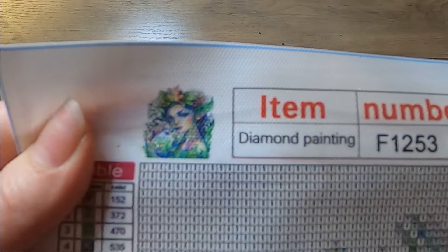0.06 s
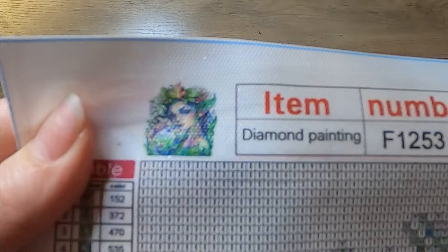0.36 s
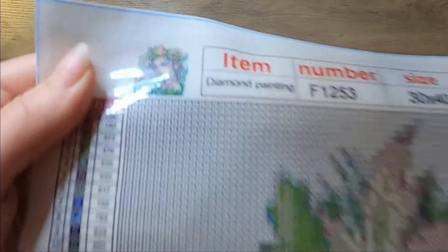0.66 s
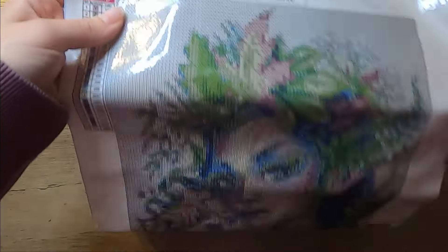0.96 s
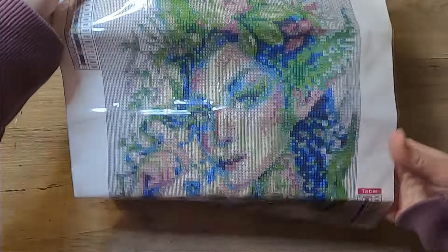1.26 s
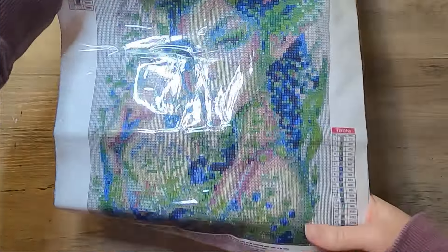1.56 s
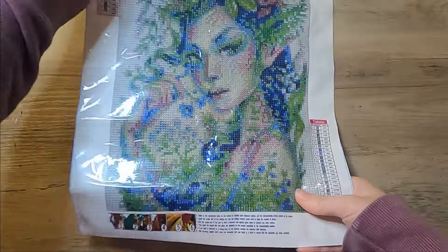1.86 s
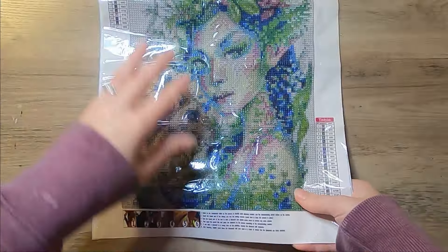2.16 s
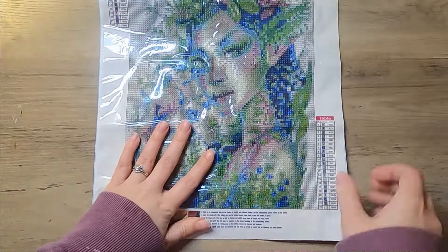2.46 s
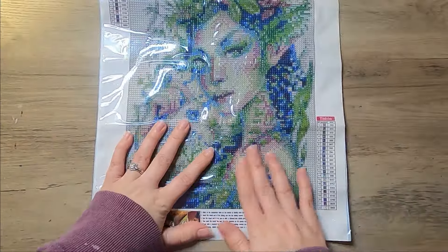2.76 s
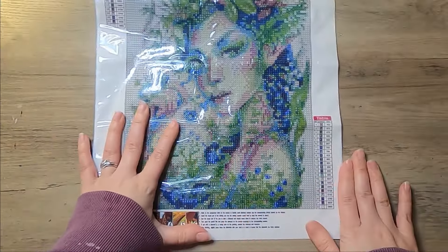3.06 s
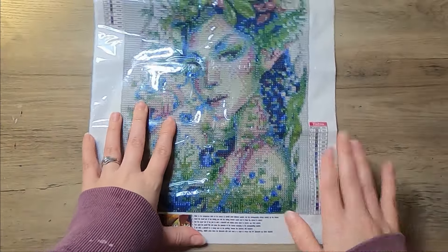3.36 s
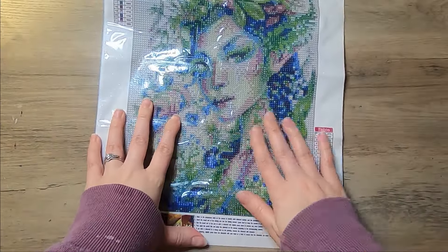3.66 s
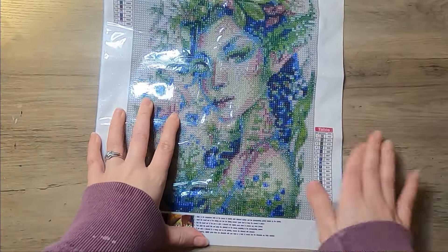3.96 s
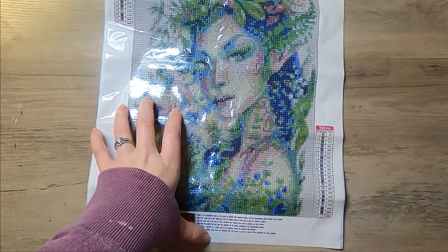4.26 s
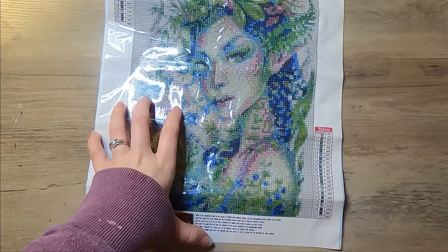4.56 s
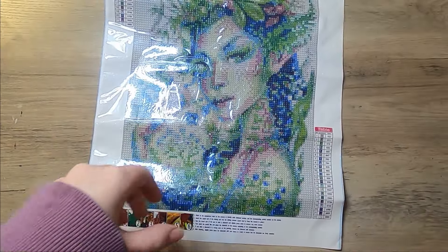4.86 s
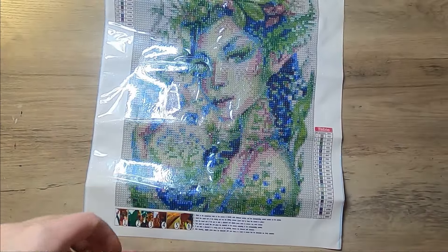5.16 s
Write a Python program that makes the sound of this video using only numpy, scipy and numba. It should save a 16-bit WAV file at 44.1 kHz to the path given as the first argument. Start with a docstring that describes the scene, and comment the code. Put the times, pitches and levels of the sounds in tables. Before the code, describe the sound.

A few faint ticks give way to a burst of sharp crinkling and dull thumps as hands turn a canvas under stiff plastic film. The sheet wobbles softly, pops once loudly and settles on a wooden table. Hands then smooth it in several swishing, crackling strokes that thin out to small presses, a soft brush of cloth and one last crisp snap. The sound is close, in a quiet room.

```python
"""In a small quiet room, close to a phone, a canvas under stiff plastic film is lifted and turned.
Handling it makes soft low thumps, creases snap and crinkle, and the loose sheet drums and pops faintly.
It is dragged down onto a wooden table, buckles with a loud pop and flops on the wood.
Palms then press and rub it flat, while the film goes on crackling.
Last come a few short presses, the soft brush of a sleeve and a snap as the hand lifts off."""
import sys
import numpy as np
from scipy import signal
from scipy.fft import rfft, irfft
from scipy.io import wavfile
from scipy.ndimage import uniform_filter1d
from numba import njit

SR = 44100
rng = np.random.default_rng(int(sys.argv[2]) if len(sys.argv) > 2 else 0)


def store_pcm(level_fs):
    """Save levels as 16-bit WAV."""
    pcm = np.round(np.clip(level_fs, -1, 1) * 32767).astype(np.int16)
    wavfile.write(sys.argv[1], SR, np.atleast_2d(pcm).T)


N = 230145
MIC_LAG_SAMPLES = 3  # the left microphone is a little further from the sheet


def undb(db):
    """Turn decibels into a gain."""
    return 10 ** (np.asarray(db) / 20)


def curves(table):
    """Join a table's rows with straight lines in time, one curve per column."""
    times, *columns = np.transpose(table)
    return [np.interp(np.arange(N) / SR, times, column) for column in columns]


def colour(x, points):
    """Shape the tone along (Hz, dB) points, with a filter that never rings ahead of the sound."""
    size = 4096
    hz, db = np.transpose(points)
    grid = np.maximum(np.fft.rfftfreq(size, 1 / SR), 1)
    gains = undb(np.interp(np.log(grid), np.log(hz), db))
    cepstrum = irfft(np.log(gains))
    cepstrum[1:size // 2] *= 2
    cepstrum[size // 2 + 1:] = 0
    response = irfft(np.exp(rfft(cepstrum)))
    return signal.fftconvolve(np.atleast_2d(x), response[None], axes=1)[:, :x.shape[-1]]


@njit
def resonate(x, hz, width):
    """Let through one band of pitches, whose centre and width may move."""
    y, band, low = np.empty(len(x)), 0., 0.
    for i in range(len(x)):
        g, damping = np.tan(np.pi * min(hz[i] / SR, .45)), width[i] / hz[i]
        v = (band + g * (x[i] - low)) / (1 + g * (g + damping))
        band, low, y[i] = 2 * v - band, low + 2 * g * v, damping * v
    return y


def ring(pair, hz, q):
    """Make both channels ring at one pitch; a higher q rings longer."""
    hz = hz * np.ones(pair.shape[1])
    return np.array([resonate(x, hz, hz / q) for x in pair])


def even(x, span_s):
    """Hold the average level at 1 while single clicks still stand out."""
    power = uniform_filter1d(np.mean(x ** 2, axis=0), max(int(span_s * SR / 2), 8))
    power = uniform_filter1d(power, max(int(span_s * SR), 8))
    return x / np.sqrt(np.maximum(power, 1e-6 * power.mean()))


def pan(db):
    """Left and right gains, with the left louder by db."""
    return undb(np.array([[.5], [-.5]]) * db)


def add(out, s, sound):
    """Mix a short sound in at s seconds."""
    i = int(np.clip(s * SR, 0, N - 1))
    out[:, i:i + sound.shape[1]] += sound[:, :N - i]


def noise(size, apart):
    """Stereo noise; the larger apart is, the more left and right differ."""
    return (rng.standard_normal(size) + apart * rng.standard_normal((2, size))) / np.hypot(1, apart)


def clicks(rate, spread_db):
    """About rate random clicks a second, many small and a few large."""
    fired = np.flatnonzero(rng.random(N) < rate / SR)
    sizes = undb(spread_db * np.minimum(rng.exponential(size=len(fired)), 4))
    out = np.zeros(N)
    out[fired] = sizes * rng.choice([-1, 1], len(fired))
    return out


def flutter(rate):
    """A random wobble of size near 1 that turns rate times a second."""
    hold = max(int(SR / rate), 2)
    steps = np.repeat(rng.standard_normal(N // 50), hold)[:N]
    return 1.2 * uniform_filter1d(steps, hold)


def place(pair):
    """Each crease lies at its own spot, so the delay between left and right varies a little."""
    right = np.pad(pair[1], (rng.integers(0, MIC_LAG_SAMPLES), 0))
    return np.array([pair[0], right[:pair.shape[1]]])


def microphones(pair):
    """The right microphone hears more bass and high treble, the left more of the low treble."""
    # how their tone differs: (frequency [Hz], left minus right [dB])
    difference = [(100, -5), (700, -2.5), (1300, -1.5), (2400, 1), (4400, 4.5), (6000, 0.5), (8100, -6.5),
                  (15000, -4)]
    return np.vstack([colour(x, [(hz, side * db) for hz, db in difference])
                      for x, side in zip(pair, (.5, -.5))])


def crease(crack_s, ring_s, ring_db, apart):
    """One crease: a sharp crack, then ripples that die away across the film."""
    t = np.arange(SR // 50) / SR
    crack = np.exp(-t / crack_s) * noise(len(t), apart)
    ripples = undb(ring_db) * np.exp(-t / ring_s) * noise(len(t), 2 * apart)
    return (crack + ripples) / np.sqrt(np.sum((crack + ripples) ** 2) / 2)


def grains(rate, spread_db, apart, spots=12):
    """Clicks from several spots that each ring in their own way."""
    out = 0
    for _ in range(spots):
        hits = clicks(rate / spots, spread_db)
        spot = crease(crack_s=0.00012, ring_s=0.0017, ring_db=-19, apart=apart)
        out = out + signal.oaconvolve(hits[None], spot, axes=1)[:, :N]
    return out


def swell(s, attack_s, hold_s, release_s):
    """Power of a hand movement: it rises 20 dB over the attack, holds, and falls 20 dB per release."""
    t = np.arange(N) / SR - s
    away = np.maximum(-t / attack_s, (t - hold_s) / release_s)
    return undb(-20 * np.clip(away, 0, 10)) ** 2


def room_tone():
    """The quiet room: a low rumble with a little hiss."""
    # tone of the room: (frequency [Hz], level [dB])
    rumble_colour = [(20, -8), (40, 3), (65, -20), (100, -28), (170, -18.5), (280, -24.5), (600, -35),
                     (1500, -39.5), (3000, -58), (4300, -50), (7500, -58), (9500, -55), (15000, -63)]
    rumble = colour(noise(N, apart=1.0), rumble_colour)
    return rumble / rumble.std() * undb(-58)


def room_echo(x, decay_s, level_db):
    """The table and near walls send back a short echo with the highest treble softened."""
    t = np.arange(SR // 2) / SR
    tail = rng.standard_normal((2, len(t))) * undb(-60 * t / decay_s) * (t > .003)
    tail /= np.sqrt(np.sum(tail ** 2) / 2)
    tail = colour(tail, [(200, 0.5), (1500, 2.0), (7000, 3.0), (14000, -10)])
    return undb(level_db) * signal.fftconvolve(x, tail, axes=1)[:, :N]


def sleeve():
    """A sleeve brushes along with a soft hiss."""
    # tone of the cloth: (frequency [Hz], level [dB])
    cloth_colour = [(500, 0), (2500, -13.5), (4300, 1.5), (7400, -1), (8600, -9.5), (14000, -39)]
    # strength of the brushing: (time [s], level [dB])
    brushing = [(0, -90), (3.9, -61.5), (4.2, -66), (4.6, -75.5), (4.85, -72.5), (5.0, -72), (5.14, -77.5),
                (5.22, -78)]
    hiss = colour(noise(N, apart=0.84), cloth_colour)
    db, = curves(brushing)
    return hiss / hiss.std() * undb(db)


def drumming(rub_db):
    """The loose sheet booms like a drum skin whose tightness changes; lying flat, it barely sounds."""
    # the sheet tightens and slackens: (time [s], level [dB], pitch [ratio])
    tightening = [(0.65, -76, 0.79), (0.85, -54.5, .72), (1.25, -57, 0.97), (1.375, -46.5, 1.19),
                  (1.555, -47.5, 0.93), (1.61, -53, 0.94), (1.84, -54.5, 1.3), (2.02, -59.5, 1.22),
                  (2.15, -90, 1.1)]
    # notes of the loose sheet: (frequency [Hz], level [dB])
    notes = [(415, -7.5), (540, 1), (690, -1.5)]
    # tone of the boom: (frequency [Hz], level [dB])
    boom_colour = [(90, -29.5), (250, -8), (400, 0), (560, -2.5), (680, -5.5), (850, -6.5), (1500, 2),
                   (4000, -45.5)]
    db, pitch = curves(tightening)
    t = np.arange(N) / SR
    loose = (t > tightening[0][0]) & (t < tightening[-1][0])
    pitch = pitch * np.exp(.04 * flutter(15))
    push = grains(rate=1500, spread_db=4, apart=0.071)
    boom = sum(undb(note_db) * ring(push, hz * pitch, q=8.2) for hz, note_db in notes)
    skin = even(colour(boom + 0.18 * push, boom_colour), span_s=0.16)
    return skin * (loose * undb(db) + undb(rub_db - 29.5))


def thumps():
    """Soft low thumps as the canvas is handled, buckles and lands: a low pulse plus a dull pat."""
    # the thumps: (time [s], level [dB], pitch [Hz], pat relative to that level [dB])
    low_thumps = [(0.008, -45.5, 42.7, -12), (0.393, -46.5, 46.3, -11), (0.62, -51.5, 48.4, -7),
                  (0.7, -52, 120, -8.5), (0.797, -38, 333, -2), (0.855, -30.5, 70.4, -9),
                  (0.9, -34.5, 50, -18), (0.946, -30, 416, -9.5), (0.983, -37.5, 144, -15),
                  (1.051, -34.5, 68, -13.5), (1.075, -40, 45.7, -7.5), (1.362, -38.5, 48, -9),
                  (1.663, -42, 149.2, -7), (1.731, -34.5, 50, -11), (1.889, -41.5, 50, -13),
                  (2.03, -48, 149, -6), (2.08, -46.5, 55, -10), (2.355, -38.5, 54.9, -10.5),
                  (2.489, -46.5, 259, -2.5), (2.751, -35.5, 46.3, -8.5), (2.86, -49, 170, -5.5),
                  (2.971, -37.5, 48.9, -5.5), (3.039, -41.5, 144.7, -7), (3.459, -44, 261.9, -1.5),
                  (3.499, -47, 46, -5), (3.853, -48, 46.4, -14), (4.06, -45, 219.4, -5),
                  (4.272, -43.5, 171, -5.5), (4.41, -48.5, 160, -4)]
    # dull tone of the pat: (frequency [Hz], level [dB])
    pat_colour = [(40, -18.5), (90, -9.5), (150, 1.5), (330, -3), (600, -17.5), (1500, -32), (5000, -60)]
    out, t = np.zeros((2, N)), np.arange(SR // 4) / SR
    rise = 1 - np.exp(-t / 0.0016)
    for s, db, hz, pat_db in low_thumps:
        pulse = rise * np.exp(-t * hz / .7) * np.sin(2 * np.pi * hz * t)
        pat = colour(rise * np.exp(-t / 0.048) * noise(len(t), apart=0.25), pat_colour)
        thump = 0.82 * pulse / np.abs(pulse).max() + undb(pat_db) * pat / np.abs(pat).max()
        add(out, s, undb(db) * thump)
    return out


def buckles():
    """The stiff canvas pops through and rings briefly."""
    # notes of the canvas: (frequency [Hz], level [dB], time to fade by 60 dB [s])
    notes = [(419, -9, 0.021), (639, -3.5, 0.018), (1316, -9, 0.012), (1450, -37, 0.014),
             (2840, -6.5, 0.011), (3750, -13.5, .007), (4200, 6.5, 0.0013), (5020, -9, .01),
             (6400, -16, .006), (7060, -14, 0.011)]
    # when it buckles: (time [s], peak level [dB])
    pops = [(0.945, -26.5), (1.8405, -13)]
    out, t = np.zeros((2, N)), np.arange(SR // 20) / SR
    pop = sum((-1) ** k * undb(db - 60 * t / decay_s) * np.sin(2 * np.pi * hz * t)
              for k, (hz, db, decay_s) in enumerate(notes))
    for s, db in pops:
        add(out, s, pop[None] / np.abs(pop).max() * undb(db))
    return out


def sliding():
    """How loud the rubbing is and how it rings over time; the strongest stroke leads."""
    # strokes of canvas and palms; the touched patch rings higher as it shrinks:
    # (time at full speed [s], attack [s], hold [s], release [s], level [dB],
    #  patch pitch [Hz], its rise [octaves], patch ring [dB], air gap ring [dB])
    strokes = [(0.808, 0.13, .15, .12, -45, 1380, 0.1, -6, -8),
               (1.057, 0.075, 0.064, .25, -42.5, 1460, 0.039, -4, -14),
               (1.349, .25, 0.045, 0.16, -42, 2560, 0, -14, -18),
               (1.501, 0.077, 0.065, .1, -40.5, 2454, 0.014, -4, -12),
               (1.732, 0.23, 0.16, .15, -48, 2836, -0.046, -12, -3),
               (1.958, 0.0058, 0.016, .05, -44, 1885, 0.051, -12, 10),
               (2.007, 0.032, .015, 0.025, -38, 1804, -0.07, 2.5, 10),
               (2.045, 0.017, 0.013, 0.096, -44, 1730, 0, 0, 15),
               (2.247, .12, 0.084, 0.11, -57, 1930, -0.34, -5, 8.5),
               (2.356, 0.00503, 0.038, 0.095, -42, 1467, 0.13, -2, 7),
               (2.439, .06, 0.06, 0.029, -38, 1639, 0.37, 8, -16),
               (2.55, 0.018, .13, .06, -62, 1700, 0.051, -1, -8),
               (2.749, .012, .006, 0.074, -48, 2430, -0.065, 10, -17),
               (2.871, 0.082, 0.16, .1, -51.5, 3004, 0.011, -3, -11),
               (3.189, 0.12, 0.048, 0.042, -36, 2430, 0.13, -1.5, -6),
               (3.407, .11, 0.036, 0.12, -39, 2514, -0.14, -3, -1.5),
               (3.513, 0.088, 0.019, .02, -44.5, 1708, 0.044, -10, 19),
               (3.633, 0.0092, 0.034, 0.057, -53, 2700, 0.013, 1, -2),
               (3.741, 0.029, 0.14, 0.11, -57, 2501, 0.055, -6, -16),
               (3.976, 0.063, 0.051, 0.092, -49.5, 2260, -0.03, -14, -26),
               (4.101, .05, .13, 0.076, -66.5, 1510, 0.012, -12, -8),
               (4.279, 0.026, .1, 0.068, -58.5, 1380, -0.19, -13, 14),
               (4.336, 0.039, 0.011, 0.033, -45.5, 1140, -0.077, 20, 16),
               (4.541, 0.062, 0.045, 0.17, -59, 1505, -0.011, -17, -0.5),
               (4.74, 0.021, 0.045, 0.29, -71.5, 1400, 0.035, -15, -3)]
    resting_power = undb(-81) ** 2  # fingers shift on the canvas
    t = np.arange(N) / SR
    total = pitch = patch = gap = 0
    for s, attack_s, hold_s, release_s, db, hz, octaves, patch_db, gap_db in strokes:
        power = swell(s, attack_s, hold_s, release_s) * undb(db) ** 2
        total += power
        pitch += power * np.interp(t, [s, s + hold_s], [hz, hz * 2 ** octaves])
        patch += power * patch_db
        gap += power * gap_db
    return 10 * np.log10(total + resting_power), pitch / total, patch / total, gap / total


def rubbing(db, patch_hz, patch_db, gap_db):
    """The weave catches and slips, ringing the touched patch and the air gap under the canvas."""
    # tone of the sliding weave: (frequency [Hz], level [dB])
    weave_colour = [(200, -20), (680, -25.5), (850, -13), (1080, -6), (1500, 0), (2600, 0), (4200, -5.5),
                    (7000, -23), (14000, -30.5)]
    stutter = grains(rate=4000, spread_db=1.4, apart=0.22) * undb(1.9 * flutter(110))
    slips = colour(stutter, weave_colour)
    patch = undb(patch_db) * ring(slips, patch_hz, q=7)
    air_gap = undb(gap_db) * ring(slips, hz=1053, q=6)
    return even(slips + 2 * (patch + air_gap), span_s=0.062) * undb(db + 1.2 * flutter(44.98))


def bending():
    """How loud, how bright and how far to one side the film crinkles as it bends, all in dB."""
    # the film is lifted, dragged down, pressed flat and let go: (time at full strength [s], attack [s],
    # hold [s], release [s], level [dB], bright edge relative to that level [dB], left minus right [dB])
    bends = [(0.80, 0.081, 0.093, 0.13, -41.5, -13.5, -1), (0.948, 0.12, .23, 0.095, -42, -13, -0.5),
             (1.28, 0.2, 0.23, 0.11, -42.5, -16.5, 0), (1.52, 0.06, 0.048, 0.13, -38, -9, -2),
             (1.669, 0.14, 0.24, 0.065, -43, -10, -2.5), (2.003, 0.1, 0.043, 0.056, -44.5, -11, -2),
             (2.12, 0.081, 0.14, 0.11, -59, -16, -1), (2.377, 0.064, 0.14, 0.12, -45, -9, -1),
             (2.612, 0.011, 0.094, 0.039, -56.5, -11, 0), (2.75, 0.022, 0.038, 0.019, -45, -10.5, 1.5),
             (2.829, 0.032, .07, 0.11, -38.5, -11.5, 1), (2.932, 0.048, 0.064, .09, -37, -17.5, 0),
             (3.066, 0.097, 0.064, .05, -44.5, -14, -2.5), (3.177, 0.076, 0.054, 0.044, -37.5, -14.5, -1.5),
             (3.412, .13, .04, 0.095, -39.5, -16.5, -1), (3.638, 0.018, .03, 0.044, -49.5, -5.5, -1.5),
             (3.738, 0.059, 0.021, 0.066, -44.5, -8, -0.5), (3.824, .03, 0.051, 0.057, -41.5, -11, -1),
             (3.969, .04, .03, 0.094, -40.5, -9, -1), (4.15, 0.096, .2, 0.24, -63, -16, 0),
             (4.527, .04, 0.07, 0.13, -63.5, -12, -0.5), (4.752, 0.011, 0.012, 0.11, -66, -3.5, 3)]
    body, edge, side = undb(-85.5) ** 2, undb(-99) ** 2, 0  # the film held still
    for s, attack_s, hold_s, release_s, db, edge_db, side_db in bends:
        power = swell(s, attack_s, hold_s, release_s) * undb(db) ** 2
        body += power
        edge += power * undb(edge_db) ** 2
        side += power * side_db
    return 10 * np.log10(body), 10 * np.log10(edge), side / body


def crinkle(db, edge_db, rub_db, spots=24):
    """Tiny spots of film tick in flurries, each at its own pitch; sliding crowds the ticks into a blur."""
    # main tone of the ticks: (frequency [Hz], level [dB])
    body_colour = [(300, -9.5), (800, -37.5), (1500, -6.5), (3000, 0), (4500, 3.5), (5600, 0.5),
                   (7600, -2.5), (8800, -20), (12000, -30.5)]
    # their bright edge: (frequency [Hz], level [dB])
    edge_colour = [(3000, -42), (6500, -24), (8200, -4), (9800, 0), (12300, 7), (14000, -5), (16000, -14.5)]
    ticks_per_s = (1050 * undb(.8 * (rub_db + 50.5)) + 260) * undb(4 * flutter(70))
    ticks = 0
    for hz in np.geomspace(2500, 10000, spots):
        crack = crease(crack_s=.0002, ring_s=.0016, ring_db=-14, apart=.8)
        tick = place(ring(crack, hz, q=2.2))
        hits = clicks(ticks_per_s / spots, spread_db=2.3)
        ticks = ticks + signal.oaconvolve(hits[None], tick, axes=1)[:, :N]
    body = even(colour(ticks, body_colour), span_s=0.047) * undb(db)
    edge = even(colour(ticks, edge_colour), span_s=0.038) * undb(edge_db)
    return body + edge


def snaps():
    """A big crease snaps through and rings a small spot of film; a sharp fold adds a bright edge."""
    # creases that snap through: (time [s], level over 1 ms [dB], pitch [Hz],
    # bright edge relative to the body [dB], left minus right [dB])
    creases = [(0.1837, -44.0, 6200, -15, 3), (0.4702, -48.0, 6800, -5, 4), (0.5349, -43.5, 3900, 4, -7),
               (0.5933, -48.0, 6700, -1, -7), (0.6791, -41.0, 6000, -4, -8), (0.7003, -29.5, 6600, -9, -7),
               (0.7759, -28.5, 5900, -6, -10), (0.791, -27.5, 6100, -10, -5), (0.797, -27.0, 6300, -14, -7),
               (0.8051, -17.5, 4600, -22, -5), (0.8066, -22.0, 4700, -14, -4),
               (0.8179, -21.0, 5100, -19, -5), (0.8494, -24.5, 4900, -9, -4), (0.859, -20.5, 5300, -12, -5),
               (0.862, -14.0, 4800, -14, -4), (0.8639, -14.5, 5300, -16, -4),
               (0.8652, -18.0, 5200, -14, -4), (0.874, -28.0, 5500, -13, -4), (0.9107, -31.0, 3900, -19, 6),
               (0.9573, -20.5, 4500, -16, 3), (0.9586, -20.0, 4500, -19, 4), (1.1228, -31.5, 4700, -15, 1),
               (1.5861, -26.0, 4800, -18, -4), (1.8404, -19.5, 4000, -28, 0), (1.8979, -28.5, 5400, 1, -6),
               (1.9549, -31.5, 6200, -13, -7), (1.9642, -29.0, 4300, -9, -5),
               (2.1815, -45.5, 4900, -16, -3), (2.1989, -43.5, 3800, -12, 0),
               (2.3302, -33.5, 6000, -10, -4), (2.3577, -30.5, 2500, -15, -3),
               (2.3637, -28.5, 2800, -17, -2), (2.3938, -30.0, 4400, -8, -3), (2.5041, -26.5, 2600, -32, 2),
               (2.5125, -28.5, 5300, -1, -6), (2.5467, -34.5, 3700, -22, -2),
               (2.5605, -36.0, 4900, -11, -5), (2.6057, -33.5, 4400, -17, -3),
               (2.6085, -30.0, 5100, -14, 1), (2.6427, -38.5, 4500, -12, -4),
               (2.6985, -35.5, 5300, -19, -3), (2.7437, -32.0, 3700, -11, -1),
               (2.7488, -27.0, 2900, -25, 0), (2.7839, -33.0, 5000, -14, -1),
               (2.8161, -28.5, 5900, -14, -3), (2.834, -29.0, 3800, -21, -1),
               (2.8552, -27.5, 4100, -20, -1), (2.8774, -25.5, 5000, -9, -1), (2.9281, -27.5, 5200, -13, 0),
               (2.9925, -28.5, 4600, -22, 4), (3.0701, -30.0, 4900, -15, -4),
               (3.1232, -33.0, 5200, -19, -1), (3.1415, -29.5, 4200, -12, 1), (3.3032, -42.0, 4500, -7, -4),
               (3.3198, -37.0, 3900, -14, -3), (3.6319, -35.5, 3300, -22, 0), (3.6436, -34.0, 6400, -5, -6),
               (3.6702, -30.5, 4400, -12, -2), (3.6978, -31.0, 4800, -8, -1), (3.7473, -33.0, 5600, -8, -4),
               (3.82, -32.5, 4900, -10, 1), (3.8724, -29.0, 4700, -17, 0), (3.9432, -35.0, 4300, -27, 2),
               (3.9744, -24.5, 4600, -11, 4), (3.9805, -29.5, 4900, -14, 4), (4.005, -29.5, 5800, -14, -6),
               (4.0483, -35.0, 5800, -7, -3), (4.0824, -39.5, 5200, -10, -2),
               (4.1677, -42.5, 5500, -12, -5), (4.23, -44.0, 4500, -16, 0), (4.2742, -38.0, 3100, -32, -2),
               (4.4079, -48.0, 5300, -8, -2), (4.5128, -45.0, 5300, -12, -3), (4.5434, -45.5, 3800, -5, -3),
               (4.621, -36.0, 3100, -27, -1), (4.6629, -49.5, 3800, -14, -1),
               (4.7095, -50.0, 7000, -10, -8), (4.7494, -24.0, 7200, -6, -9), (4.7604, -40.0, 6900, -8, -3),
               (4.786, -41.0, 6200, -18, -5), (4.8909, -46.5, 5400, -18, 1), (5.1822, -40.5, 6200, -14, -4)]
    # tone of a snap: (frequency [Hz], level [dB])
    snap_colour = [(150, -14.5), (700, -13.5), (1400, 0), (4000, -2), (7500, -4.5), (9500, -7.5),
                   (12500, -2.5), (14000, -9.5), (16000, -20.5)]
    out, lead = np.zeros((2, N)), SR // 200
    until_snap_s = np.arange(lead)[::-1] / SR
    edge_hz = 9000
    low, high = (signal.butter(4, edge_hz, kind, fs=SR, output="sos") for kind in ("low", "high"))
    for s, db, hz, edge_db, side_db in creases:
        crack = crease(crack_s=0.00051, ring_s=0.003, ring_db=-11.5, apart=0.73)
        crack = colour(crack, [(4000, 1), (8000, 1.0), (14000, -3)])
        # a faint noise swells just before each snap
        lead_in = undb(-23) * np.exp(-until_snap_s / 0.0013) * noise(lead, apart=0.41)
        burst = np.hstack([lead_in, crack])
        burst[:, lead] += 0.86 * rng.choice([-1, 1])  # the click of the snap itself
        stray_hz = hz * np.exp(0.17 * rng.standard_normal())
        ringing = undb(-11.5) * burst + ring(burst, hz, q=1.7) + 1.1 * ring(burst, stray_hz, q=17)
        whole = place(microphones(colour(ringing, snap_colour)))
        body, edge = signal.sosfilt(low, whole), signal.sosfilt(high, whole)
        snap = body / body.std() + undb(edge_db) * edge / edge.std()
        snap /= np.sqrt(np.sum(snap ** 2, axis=1, keepdims=True) / (SR // 1000))
        sides = pan(side_db)
        add(out, s - lead / SR, snap * undb(db) * sides / np.sqrt(np.mean(sides ** 2)))
    return out


def scene():
    """All the handling sounds, heard by two microphones in the room."""
    crinkle_db, edge_db, side_db = bending()
    rub_db, patch_hz, patch_db, gap_db = sliding()
    surface = crinkle(crinkle_db, edge_db, rub_db) + rubbing(rub_db, patch_hz, patch_db, gap_db)
    sheet = surface * pan(side_db) + drumming(rub_db)
    left, right = microphones(sheet) + snaps() + buckles() + thumps()
    near = np.array([np.pad(left, (MIC_LAG_SAMPLES, 0))[:N], right])
    return near + room_echo(near, decay_s=0.18, level_db=-13.5) + room_tone() + sleeve()


def record(dry):
    """The phone cuts off the very highest treble."""
    top_hz = 15900
    return signal.sosfilt(signal.ellip(8, .2, 70, top_hz, fs=SR, output="sos"), dry)


dry = scene()
out = record(dry)
store_pcm(out)
```